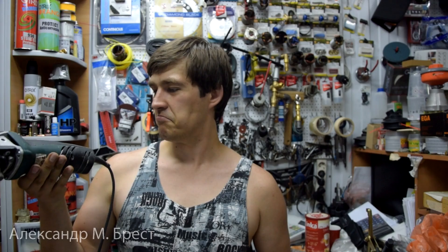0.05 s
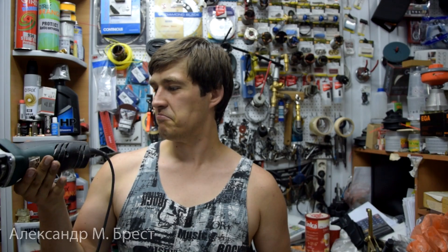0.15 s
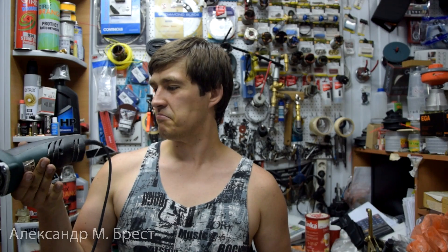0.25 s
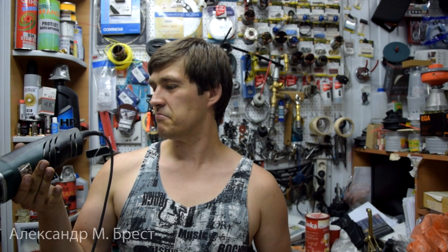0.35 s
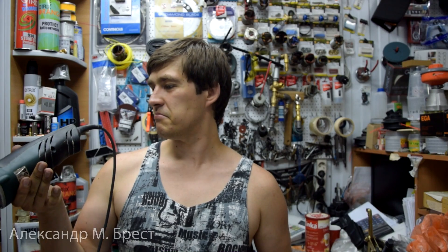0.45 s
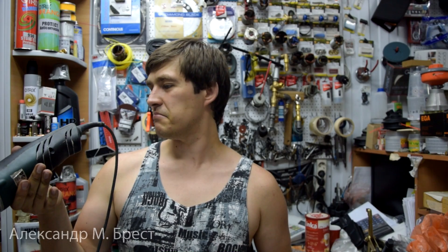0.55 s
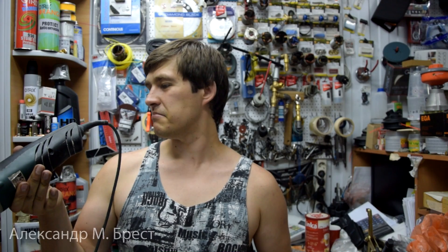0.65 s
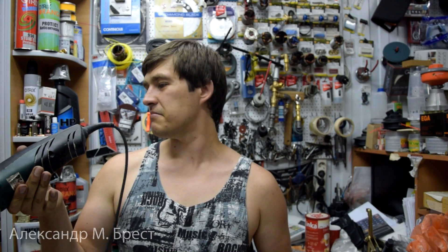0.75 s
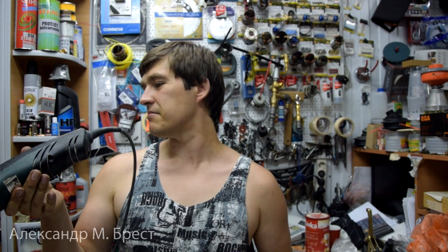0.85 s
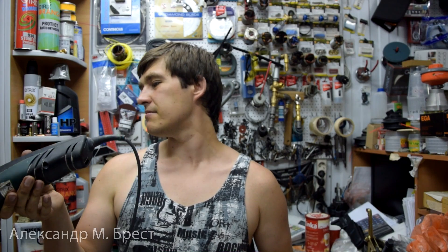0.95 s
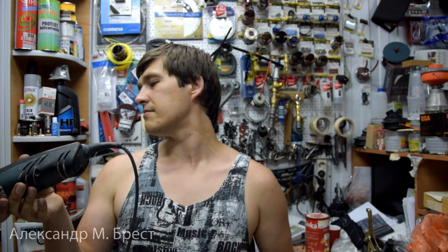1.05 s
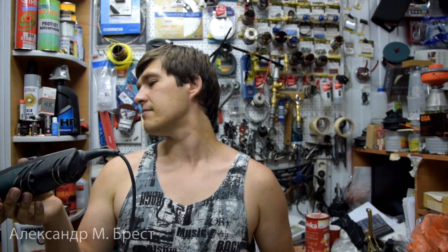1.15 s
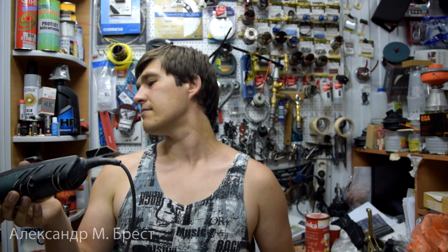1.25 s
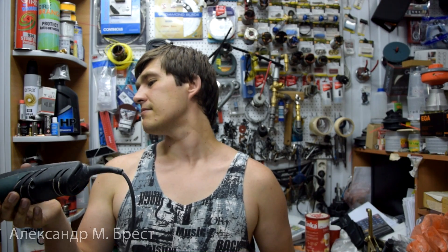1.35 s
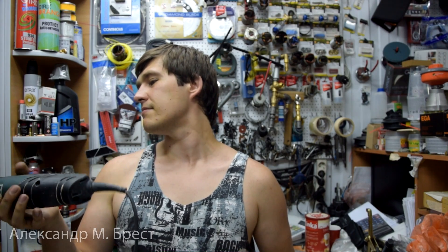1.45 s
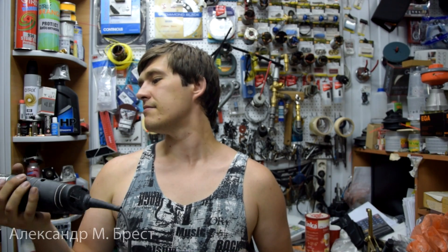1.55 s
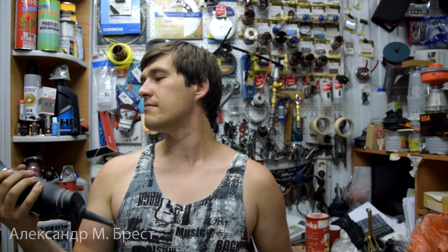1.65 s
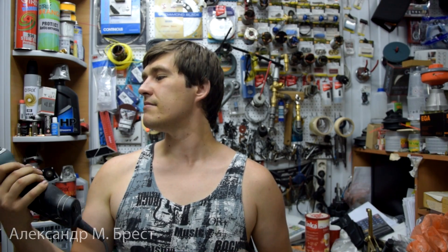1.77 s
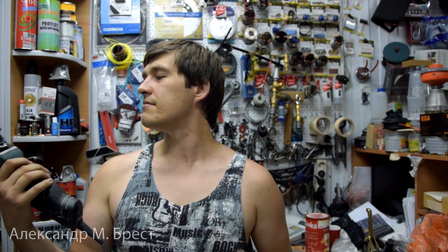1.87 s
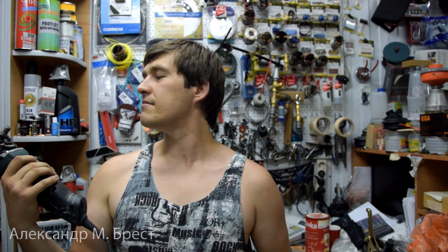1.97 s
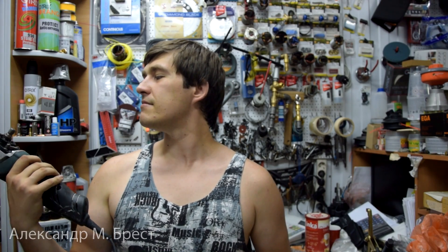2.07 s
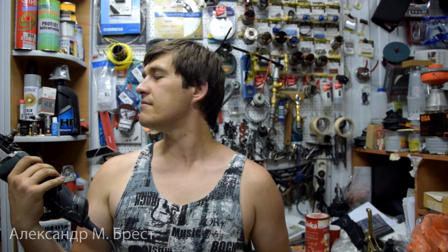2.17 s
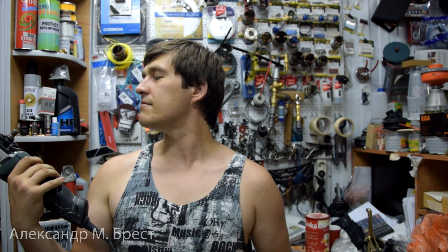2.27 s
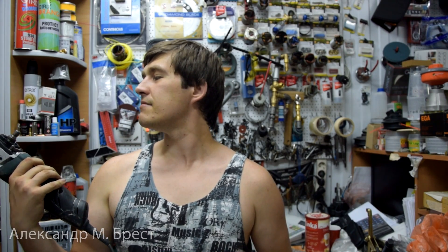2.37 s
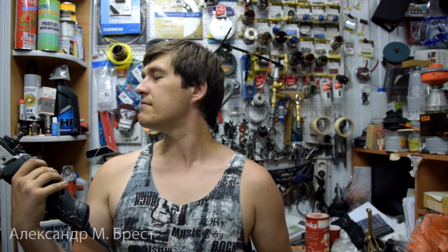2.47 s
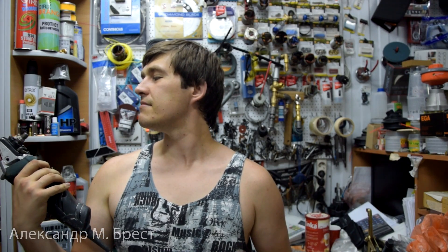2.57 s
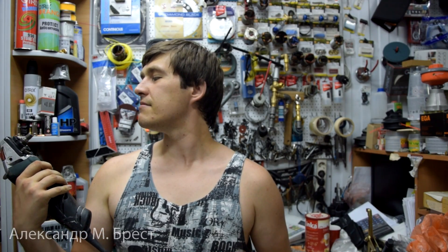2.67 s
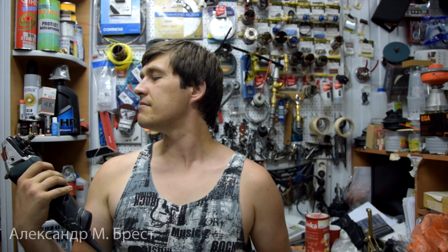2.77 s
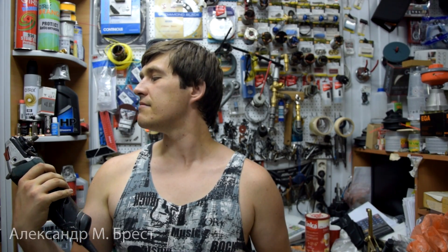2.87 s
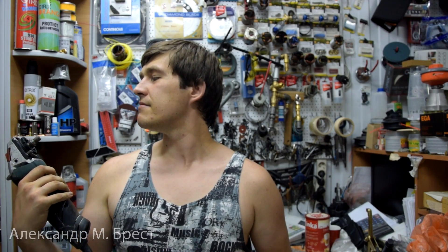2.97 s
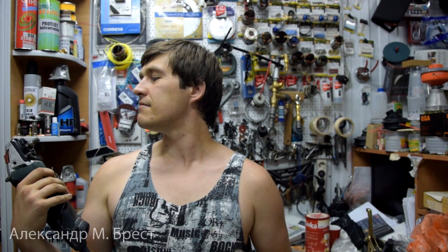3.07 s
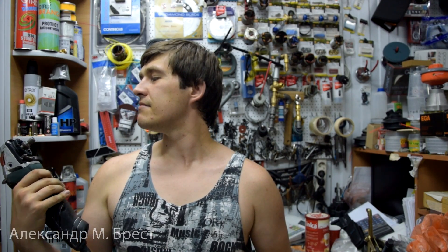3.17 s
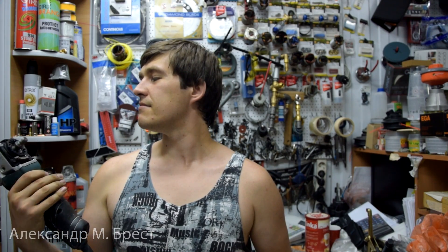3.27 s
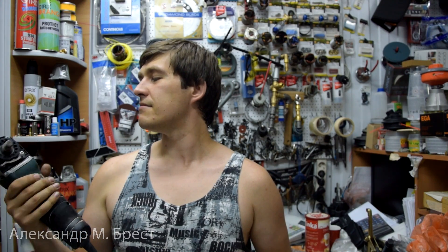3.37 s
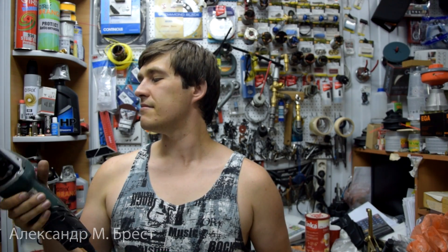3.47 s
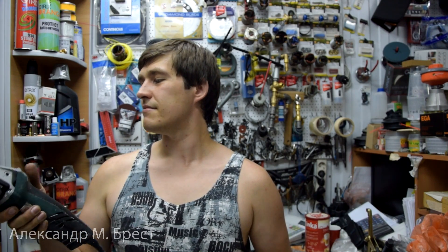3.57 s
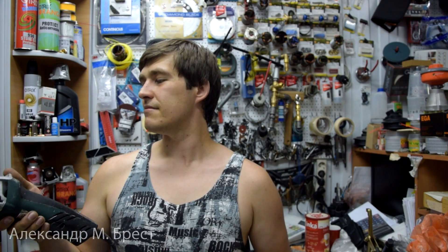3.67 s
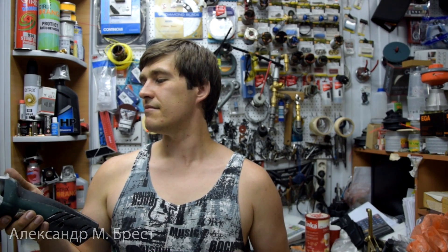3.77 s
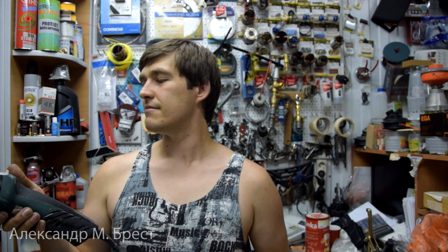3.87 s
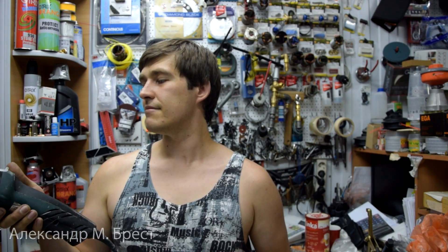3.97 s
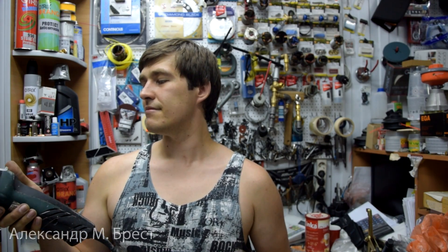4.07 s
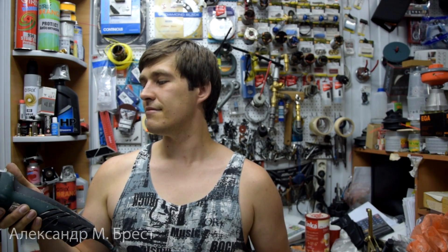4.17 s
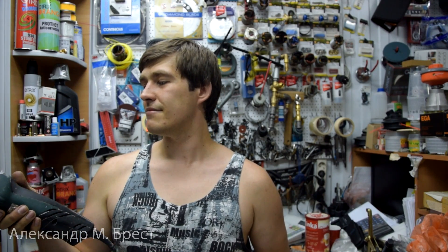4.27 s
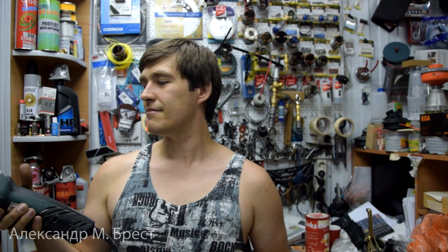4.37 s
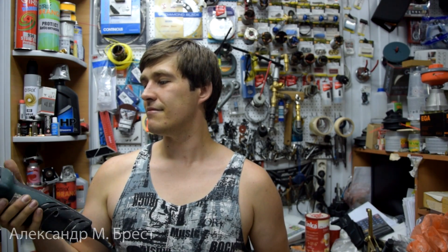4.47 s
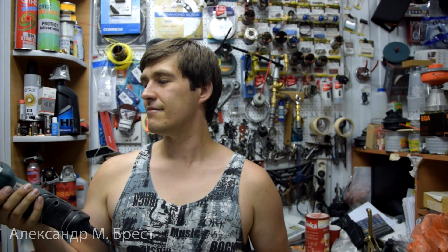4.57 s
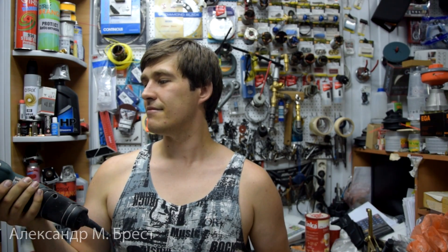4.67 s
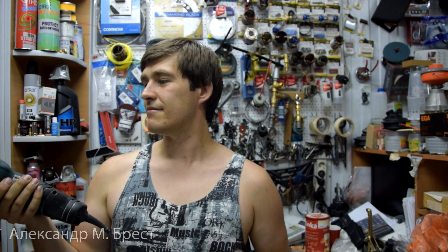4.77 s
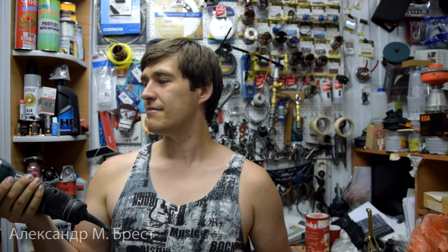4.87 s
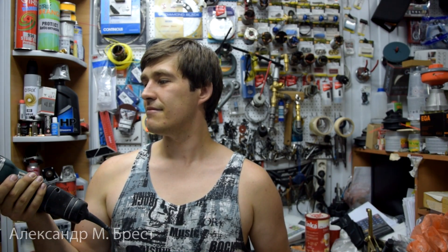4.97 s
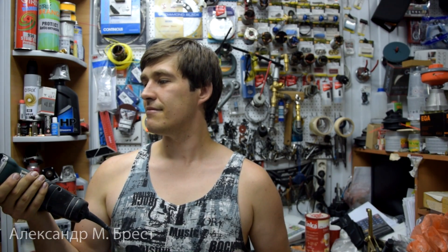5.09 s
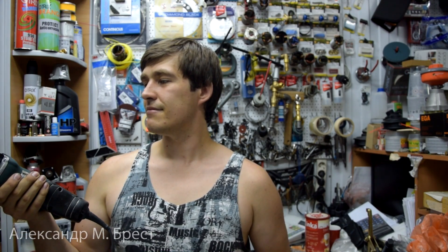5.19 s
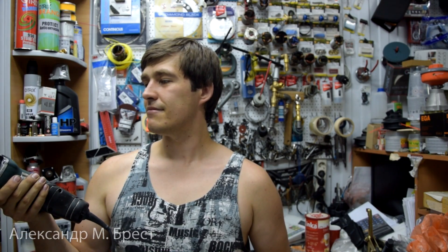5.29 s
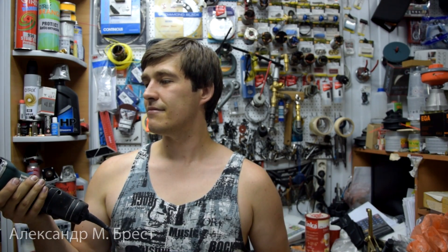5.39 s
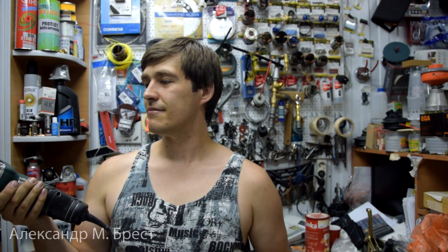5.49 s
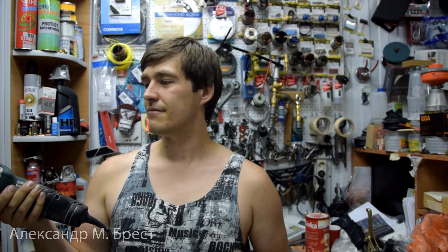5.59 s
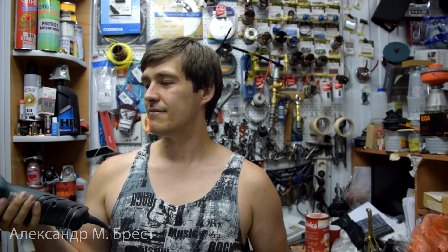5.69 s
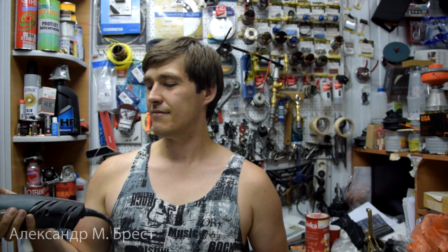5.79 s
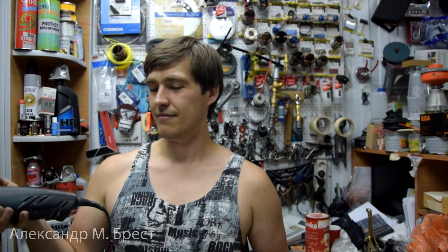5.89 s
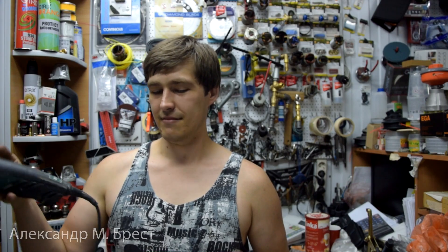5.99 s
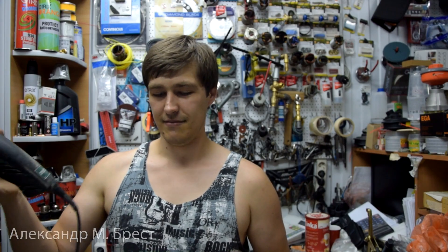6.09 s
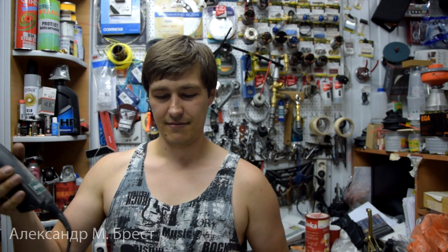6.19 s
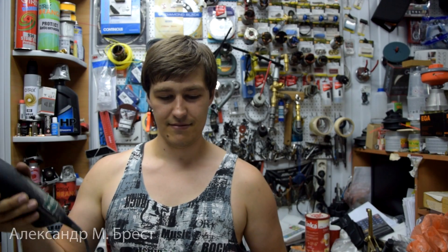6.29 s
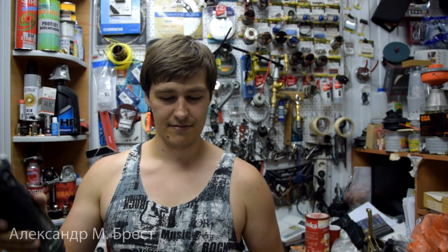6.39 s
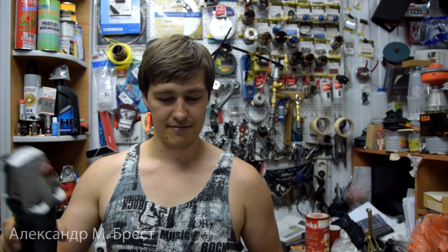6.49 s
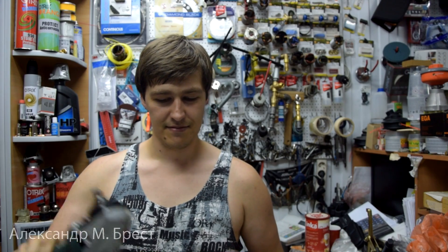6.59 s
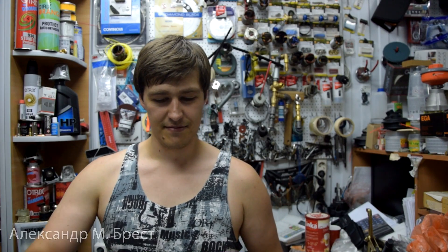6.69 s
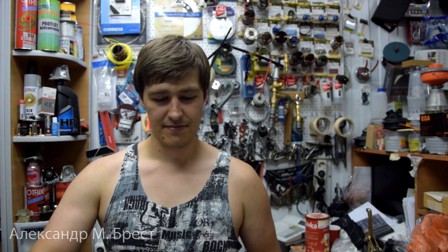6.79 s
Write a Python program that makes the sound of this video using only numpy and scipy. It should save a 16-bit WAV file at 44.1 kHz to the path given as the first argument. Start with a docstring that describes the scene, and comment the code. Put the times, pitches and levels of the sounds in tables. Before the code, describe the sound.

An angle grinder runs free at full speed close to the microphone in a small workshop, making a bright, hissing roar of air. Its exhaust thumps on the microphone at first, and the tone shifts as the tool is turned in the hand. After about four seconds it is switched off: the roar dulls and fades, a whine glides downward and the loose gears rattle as it keeps coasting.

```python
"""A bright roar of air, with gusts thumping on the microphone at first: an angle grinder runs free at
full speed in a small cluttered workshop, turned about in the hand, then is switched off and coasts down.
The roar is its fan's turbulence, coloured by the vents and the housing. As the rotor slows the roar dulls
and fades, the whine of the 31 fan blades sinks into hearing, the motor's slots and commutator sing under
it and the slack gears rattle."""
import sys
import numpy as np
from scipy import signal
from scipy.fft import rfft, irfft, next_fast_len
from scipy.io import wavfile
from scipy.ndimage import uniform_filter1d

SR = 44100
rng = np.random.default_rng(int(sys.argv[2]) if len(sys.argv) > 2 else 0)


def int16_out(signal):
    """Quantize to a 16-bit WAV file."""
    q = np.round(np.clip(np.atleast_2d(signal).T, -1, 1) * 32767)
    wavfile.write(sys.argv[1], SR, q.astype(np.int16))


N = 301676
TIME = np.arange(N) / SR

FULL_SPEED_HZ, SWITCH_OFF_S = 551.0, 4.3162
FAN_BLADES, ROTOR_SLOTS, COMMUTATOR_BARS = 31, 12, 24
GEAR_RATIO = 3.6  # rotor turns per turn of the spindle


def undb(db):
    """Decibels to amplitude."""
    return 10 ** (np.asarray(db) / 20)


def unit(x):
    """Scaled to rms 1."""
    return x / np.sqrt(np.mean(x ** 2))


def bell(x, centre, width):
    """Outline of a resonance or a swell, 1 at its centre."""
    return 1 / (1 + (2 * (x - centre) / width) ** 2)


def curve(table, t):
    """The columns of a time table at the times t."""
    times, *columns = np.transpose(table)
    return [np.interp(t, times, column) for column in columns]


def shape(points, hz):
    """Level in dB of an EQ curve, straight between its points on a log-frequency axis."""
    point_hz, db = np.transpose(points)
    return np.interp(np.log(hz + 1e-9), np.log(point_hz), db)


def colour(x, points):
    """Filter by an EQ curve."""
    size = next_fast_len(N, True)
    hz = np.arange(size // 2 + 1) * SR / size
    return irfft(rfft(x, size) * undb(shape(points, hz)), size)[..., :N]


def cut(x, hz, kind="low", order=2):
    """Butterworth low-pass or high-pass."""
    return signal.sosfilt(signal.butter(order, hz, kind, fs=SR, output="sos"), x)


def walk(rate_hz):
    """Smooth random drift with a spread near 1."""
    hold = max(int(SR / rate_hz), 1)
    steps = np.repeat(rng.standard_normal(N // hold + 1), hold)
    return 1.18 * uniform_filter1d(uniform_filter1d(steps, hold), hold)[:N]


def workshop_rumble(level_db=-82):
    """A quiet bed of low room noise."""
    # colour of the rumble (frequency [Hz], level [dB])
    spectrum = [(20, -4), (80, 13), (125, 2), (195, 3), (300, -12), (1000, -30), (16000, -44)]
    return unit(colour(rng.standard_normal((2, N)), spectrum)) * undb(level_db)


def shelf_scatter(x, t60_s=0.075, gap_s=0.0036, alike_hz=1500):
    """Short reverb scattered from full shelves; left and right share the lows."""
    t = TIME[:SR // 4]
    fade = np.exp(-np.log(1000) * t / t60_s) * (t > gap_s)
    mid, side = rng.standard_normal((2, len(t))) * fade / np.sqrt(2 * np.sum(fade ** 2))
    side = cut(side, alike_hz, "high", order=1)
    return signal.fftconvolve(x[None], np.array([mid + side, mid - side]), axes=1)[:, :N]


def echo_comb(hz, t, sway=0.0338, treble_hz=1800):
    """Comb gain of near echoes: their paths change as the hand sways; small things reflect only treble."""
    # echoes off near surfaces (delay [ms], level [dB])
    echoes = [(1.3, -25), (2.6, -22), (3.7, -20), (4.4, -19), (6.1, -19), (8.3, -19)]
    reflected = 0
    for delay_ms, db in echoes:
        delay_s = delay_ms / 1000 * (1 + sway * np.interp(t, TIME, walk(.8)))
        reflected = reflected + undb(db) * np.exp(-2j * np.pi * hz * delay_s)
    return np.abs(1 + reflected * hz ** 2 / (hz ** 2 + treble_hz ** 2))


def draught(attack_s=.024, release_s=0.036, breeze_db=-78, turn_away_at_s=2, turn_takes_s=.3):
    """Exhaust gusts hit the two microphones unequally; only the strong ones break into small eddies."""
    # colour of the buffeting air (frequency [Hz], level [dB])
    buffet = [(8, -30), (24, -13), (44, 5), (60, 3), (80, -8), (108, -1), (160, -13), (260, -30.5),
              (500, -63), (1500, -100)]
    # gusts of exhaust air (time [s], level [dB], hold [s])
    gusts = [(.176, -27.5, 0.077), (.345, -30.5, 0.026), (.44, -36.5, 0.043), (.58, -49, .005),
             (.635, -52, .04), (.82, -53, .02), (.93, -48.5, .05), (1.12, -63, 0.036)]
    eddies = colour(rng.standard_normal((2, N)), buffet)
    eddies = eddies + 0.05 * eddies[::-1]  # a little is shared between the sides
    eddies = eddies / np.sqrt(uniform_filter1d(eddies ** 2, SR // 30))  # the wind alone sets their level
    large_eddies = cut(eddies, hz=130)
    # a light breeze between the gusts lasts until the vents are turned away
    wind = undb(breeze_db) * np.clip(.5 + (turn_away_at_s - TIME) / turn_takes_s, 0, 1)
    for at_s, db, hold_s in gusts:
        early, late = np.maximum(at_s - TIME, 0), np.maximum(TIME - at_s - hold_s, 0)
        wind = np.maximum(wind, undb(db) * np.exp(-(early / attack_s) ** 2 - late / release_s))
    strength = wind / wind.max()
    buffeting = strength * eddies + (1 - strength) * large_eddies
    return buffeting * wind * undb([[4], [2]])  # harder on the left


def rotor_speed(friction_hz_per_s=35.795, grease_per_s=.278186, air_drag_per_turn=.00033056):
    """Turns per second: steady under power, then braked by brush friction, grease and air."""
    step_s = .001
    times = np.arange(SWITCH_OFF_S, TIME[-1] + step_s, step_s)
    speeds = [FULL_SPEED_HZ]
    for _ in times[1:]:
        speed = speeds[-1]
        braking = friction_hz_per_s + grease_per_s * speed + air_drag_per_turn * speed ** 2
        speeds.append(speed - step_s * braking)
    return np.interp(TIME, times, speeds)


def gear_head(impacts):
    """Tooth impacts ring the cast gear housing, which is too small to radiate bass."""
    # modes of the housing (frequency [Hz], width [Hz], level [dB])
    modes = [(892, 43, 7), (1210, 53, 5), (1810, 210, 2), (2950, 400, 0), (4230, 220, 11.5),
             (4420, 130, 16), (4750, 280, 7), (5200, 390, 5.5), (9800, 2700, -8.5)]
    t = TIME[:2048]
    ring = sum((-1) ** k * undb(db) * width * np.exp(-np.pi * width * t) * np.sin(2 * np.pi * hz * t)
               for k, (hz, width, db) in enumerate(modes))
    ring = cut(ring, hz=600, kind="high")
    return signal.fftconvolve(impacts, ring / np.abs(ring).max())[:N]


def gear_rattle(speed, hits_per_turn=7.0, scatter_db=2.5, loudest_speed_hz=212, knock_trim_db=-3):
    """Unloaded, greased teeth bounce in their backlash: a chatter with hard knocks on top."""
    # hardest knocks of the teeth (time [s], level [dB])
    hard_knocks = [(5.9144, -28), (5.9244, -26), (5.9524, -28), (5.969, -25), (5.9784, -27), (5.9874, -30),
                   (6.0144, -28), (6.025, -29), (6.0322, -29), (6.0641, -28), (6.0804, -29), (6.0944, -31),
                   (6.113, -26), (6.1244, -29), (6.1564, -28), (6.1614, -26), (6.1754, -27), (6.1884, -29),
                   (6.2094, -30), (6.2274, -31), (6.2444, -31), (6.2617, -29), (6.2654, -28), (6.2794, -32),
                   (6.312, -34), (6.3233, -29), (6.3268, -28), (6.331, -27), (6.3364, -25), (6.357, -25),
                   (6.4194, -31), (6.5116, -33), (6.5287, -30), (6.6424, -30)]
    spindle_angle = 2 * np.pi * np.cumsum(speed / GEAR_RATIO) / SR
    slack = np.exp(0.98 * np.sin(spindle_angle + 2.2 * walk(40)))  # hits bunch about once a spindle turn
    hits = rng.random(N) < hits_per_turn * speed / SR * slack / slack.mean()
    sizes = undb(scatter_db * np.minimum(rng.standard_normal(N), 2)) * rng.choice([-1, 1], N)
    octaves_away = np.abs(np.log2(speed / loudest_speed_hz))
    chatter_db = -42.2 - 4 * octaves_away + 0.6 * walk(30)
    chatter = unit(gear_head(hits * sizes)) * undb(chatter_db)
    knocks = np.zeros(N)
    for at_s, db in hard_knocks:
        knocks[int(at_s * SR)] += undb(db + knock_trim_db)
    return cut(chatter + gear_head(knocks), hz=11000)  # the contact softens the top


def rotor_tones(speed, wobble=0.0009, shake_db=2.0, jolt_rad=0.015):
    """Unbalance hum, and the whine of passing blades, slots and bars gliding through shell resonances."""
    # hum of the rotor's unbalance (rotor speed [Hz], level [dB])
    hum = [(150, -94), (215, -83), (240, -84), (256, -75), (275, -82), (298, -69), (325, -66), (372, -63),
           (390, -78), (425, -65), (460, -74), (510, -72)]
    # rotor tones (multiple of rotor speed, base level [dB], change per halving of the speed [dB],
    # flicker [dB], coupling to the shell [0-1])
    tones = [(FAN_BLADES, -46.2, -6, 1.7, 1), (ROTOR_SLOTS, -55, -7, 2.5, .7),
             (COMMUTATOR_BARS, -63, 2.6, 2.5, .8), (3 * ROTOR_SLOTS, -88, 12, 3.5, .2)]
    # resonances of the shell (frequency [Hz], width [Hz], boost [dB])
    shell = [(15550, 500, 11), (13100, 400, 5), (12270, 520, 13), (11500, 600, 10), (10650, 490, 12),
             (6800, 260, 5), (6360, 280, 5), (5220, 260, 6), (3780, 240, 7), (1960, 200, 7)]
    # tones swell and dip as the tool is turned (multiple of rotor speed, time [s], length [s], gain [dB])
    swells = [(COMMUTATOR_BARS, 5.3, .25, -9), (COMMUTATOR_BARS, 5.8, .14, 6.8),
              (COMMUTATOR_BARS, 6.77, 0.17, 5.4), (ROTOR_SLOTS, 5.78, .2, 7), (ROTOR_SLOTS, 6.42, .25, -8),
              (3 * ROTOR_SLOTS, 6.7, .1, 5), (FAN_BLADES, 6.16, .06, 3), (FAN_BLADES, 6.46, .16, -4),
              (FAN_BLADES, 6.8, .15, 3)]
    coasting = np.clip((1 - speed / FULL_SPEED_HZ) / 0.067, 0, 1)  # fades in once the power is off
    halvings = np.log2(FULL_SPEED_HZ / speed)
    angle = 2 * np.pi * np.cumsum(speed * (1 + wobble * walk(60))) / SR
    angle = angle + jolt_rad * halvings * walk(300)  # tooth impacts jolt the rotor

    def tone(multiple, db, flicker_db):
        """A flickering sine locked to the rotor; slack gears shake it more as it slows."""
        unsteady_db = db + flicker_db * walk(35) + shake_db * halvings * walk(120)
        return np.sqrt(2) * np.sin(multiple * angle) * undb(unsteady_db)

    whine = tone(1, shape(hum, speed), flicker_db=1.5)
    for multiple, base_db, change_db, flicker_db, coupling in tones:
        shell_db = coupling * sum(db * bell(multiple * speed, hz, width) for hz, width, db in shell)
        aim_db = sum(db * bell(TIME, at_s, length_s)
                     for which, at_s, length_s, db in swells if which == multiple)
        whine = whine + tone(multiple, base_db + change_db * halvings + shell_db + aim_db, flicker_db)
    return coasting * whine


def housing_cavities(hz, t, halvings, regrip_s=0.38, growth=0.25, throb=0.17):
    """EQ in dB from the air cavities of the housing that face the microphone in each grip."""
    # air resonances and notches (grip, frequency [Hz], width [Hz], boost [dB])
    cavities = [("any", 441, 37, 4.9), ("any", 900, 41, 1.9), ("any", 1760, 55, -3), ("any", 1940, 44, -2),
                ("any", 2200, 33, 3), ("any", 4417, 84, 2), ("raised", 570, 56, 4.7),
                ("raised", 1300, 100, 6), ("raised", 1840, 70, 6.1), ("raised", 3800, 250, 2.5),
                ("raised", 9700, 630, 3.2), ("level", 1840, 56, 4.2), ("level", 11500, 350, 2.5),
                ("level", 13100, 480, 5.5), ("level", 14500, 600, 3), ("upright", 300, 45, 4.7),
                ("upright", 445, 60, 3), ("upright", 800, 70, -3.5), ("upright", 950, 36, 2.9),
                ("upright", 4420, 120, 4.1), ("upright", 5100, 270, 1.8), ("swung", 4250, 500, 2.5),
                ("swung", 12600, 1500, 5.5), ("lowered", 590, 50, 2.2), ("lowered", 973, 90, 5.2),
                ("lowered", 1160, 140, -1.9), ("lowered", 1375, 52, 9), ("lowered", 1512, 41, 7.1),
                ("lowered", 5700, 140, 1.2), ("lowered", 10040, 350, 1.7), ("lowered", 11300, 440, 1.4),
                ("tipped", 470, 150, -3), ("tipped", 720, 60, 3), ("tipped", 890, 72, 4.1),
                ("tipped", 1256, 110, 7.5)]
    # ways the tool is held (grip, start [s], end [s])
    grips = [("raised", -1, 0.47), ("level", 0.47, 1.15), ("upright", 1.7, 3.35), ("swung", 3.61, 3.62),
             ("lowered", 3.53, 5.92), ("tipped", 5.82, 6.72), ("any", -1, 8)]
    facing = {grip: np.clip(.5 + np.minimum(t - start, end - t) / regrip_s, 0, 1)
              for grip, start, end in grips}
    # slower air damps the cavities less, and the uneven flow makes them throb
    ringing = 1 + growth * halvings + throb * np.interp(t, TIME, walk(18))
    return sum(db * ringing * facing[grip] * bell(hz, centre, width)
               for grip, centre, width, db in cavities)


def fan_rush(speed, gain_db=10.0, fall_db=13, dulling_db_per_octave=1.4):
    """Fan turbulence roars through the vents, weaker and duller with each halving of the speed."""
    # colour of the rush through the vents (frequency [Hz], level [dB])
    vents = [(32, -40), (75, -34), (125, -32), (265, -21.5), (520, -14.5), (750, -5), (1080, -3.5),
             (1750, -2.5), (3250, -1), (6350, -1.5), (7650, -6), (10100, -1), (12700, -3), (15650, -12.5)]
    # turbulence that slides down with the rotor (multiple of rotor speed, level [dB])
    turbulence = [(1, -4), (4, 0.5), (8, -1.5), (18, -0.5), (28, .5), (30.2, 1), (31.1, 8.5), (32, -1.5),
                  (35, -1), (46, -2), (60, -2), (90, -7)]
    # the rush as the vents are turned in the hand
    # (time [s], level [dB], tilt [dB per octave], vent hiss [dB], highest treble [dB])
    turning = [(0, -29.5, 0.56, 2, 0.5), (.7, -30, 0, 4, 1.5), (1.25, -30, -0.5, 1.5, 1),
               (1.55, -30.5, -0.26, 1.5, 0.5), (1.85, -30.5, 0.5, 3, -2), (2.2, -31, 0.15, 3, 2.5),
               (3.2, -30.5, 0.3, 2, 1), (3.44, -30.5, -0.14, 3.5, -0.5), (3.6, -30.5, 0.1, 4.5, 2),
               (4.3, -30.5, 0.34, 3, 2), (5.8, -31, .5, 2.5, -7), (6.6, -30.5, 0.7, 3, -3)]
    # share that arrives from all round the room and widens the rush (frequency [Hz], level [dB])
    diffuse_share = [(120, -5), (300, -12), (700, -14), (1400, -12), (3000, -10), (4500, -8.6),
                     (6500, -6.5), (8200, -4.2), (11000, -5), (15000, -2.8)]
    hz, t, (direct, diffuse) = signal.stft(rng.standard_normal((2, N)), SR, nperseg=2048)
    hz, rotor_hz = hz[:, None], np.interp(t, TIME, speed)
    halvings = np.log2(FULL_SPEED_HZ / rotor_hz)
    octaves = np.log2(np.maximum(hz, 300) / 2500)
    level_db, tilt_db, hiss_db, beam_db = curve(turning, t)
    db = shape(vents, hz) + level_db - fall_db * halvings
    db += shape(turbulence, hz / rotor_hz) - shape(turbulence, hz / FULL_SPEED_HZ)
    db += (tilt_db - dulling_db_per_octave * halvings) * octaves
    db += hiss_db * bell(hz, centre=4550, width=1800)
    db += beam_db * bell(hz, centre=14500, width=6200)  # the highest treble leaves the vents as a beam
    db += housing_cavities(hz, t, halvings)
    side = diffuse * undb(shape(diffuse_share, hz))
    spectra = np.array([direct + side, direct - side]) * undb(db) * echo_comb(hz, t)
    rush = signal.istft(spectra, SR)[1][:, :N]
    puffs_db = 0.38 * walk(25) + 0.4 * walk(160)  # the air leaves unevenly
    return rush * undb(gain_db + puffs_db)


def scene(rush_send_db=-15, tone_send_db=-6, rattle_send_db=-8):
    """The grinder, held a little to the left, with its room, its draught and a quiet rumble."""
    # stereo lean of the grinder (frequency [Hz], left minus right [dB])
    lean = [(120, 2.7), (280, 3.8), (1000, 1.5), (4300, 1.1), (6700, 2.9), (8500, 0), (9800, -1.7),
            (11500, .1), (13500, 4.6), (15700, 2.4)]
    speed = rotor_speed()
    rush, tones, rattle = fan_rush(speed), rotor_tones(speed), gear_rattle(speed)
    send = undb(rush_send_db) * rush.mean(axis=0)
    send += undb(tone_send_db) * tones + undb(rattle_send_db) * rattle
    left, right = rush + tones + rattle + shelf_scatter(send)
    grinder = np.array([colour(left, lean * np.array([1, .5])), colour(right, lean * np.array([1, -.5]))])
    return grinder + workshop_rumble() + draught()


def record(dry, top_hz=15800):
    """A steep low-pass takes off the very top."""
    return signal.sosfilt(signal.ellip(12, .1, 80, top_hz, fs=SR, output="sos"), dry)


dry = scene()
out = record(dry)
int16_out(out)
```